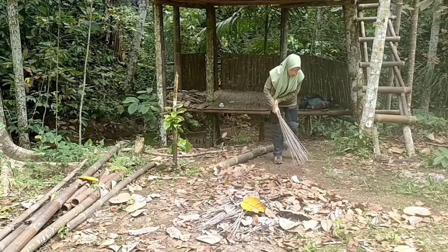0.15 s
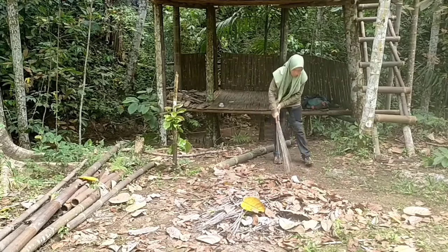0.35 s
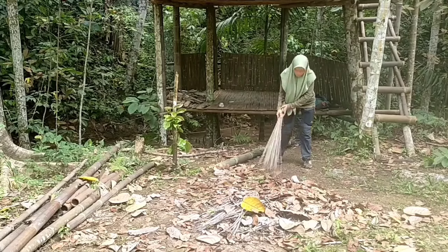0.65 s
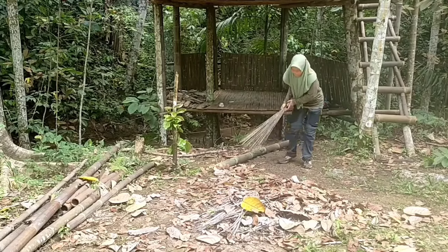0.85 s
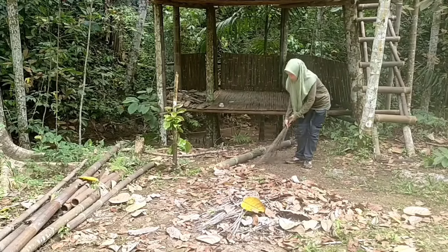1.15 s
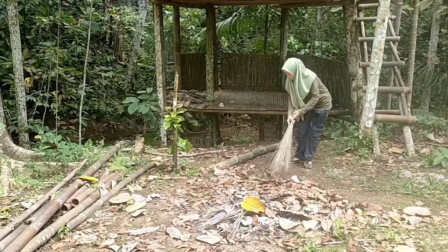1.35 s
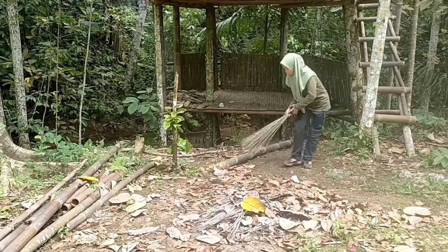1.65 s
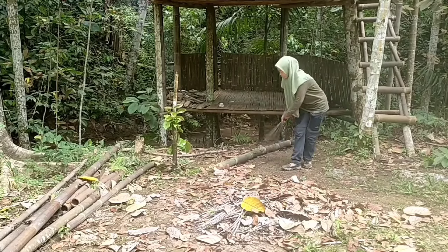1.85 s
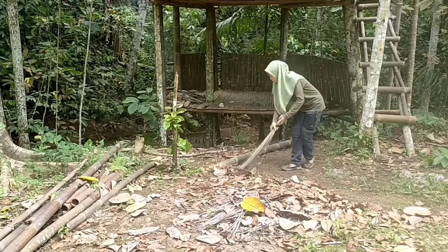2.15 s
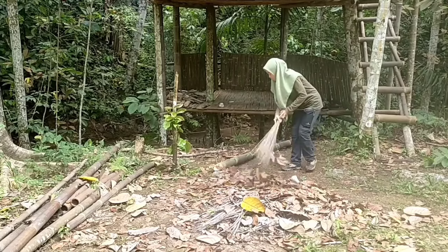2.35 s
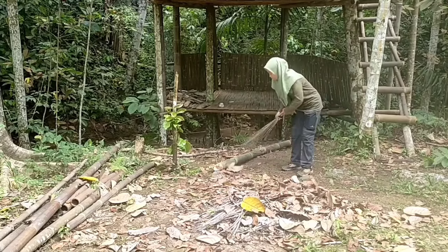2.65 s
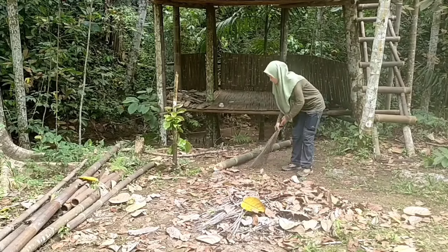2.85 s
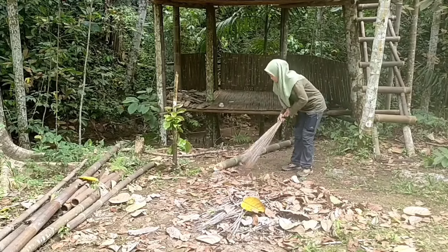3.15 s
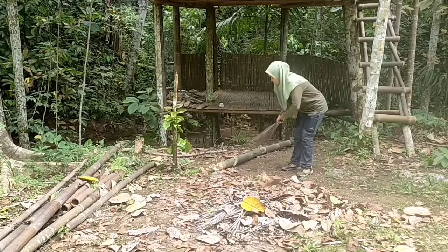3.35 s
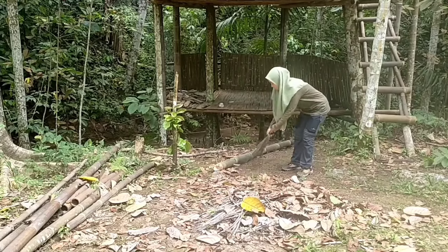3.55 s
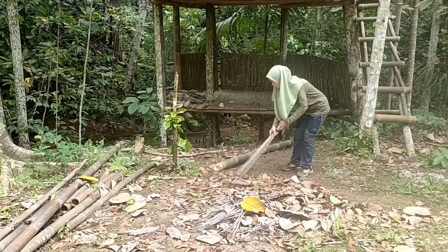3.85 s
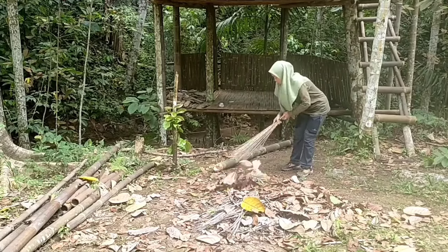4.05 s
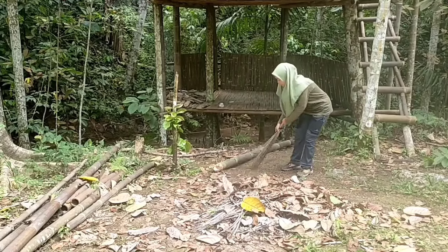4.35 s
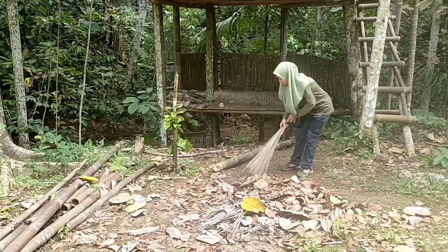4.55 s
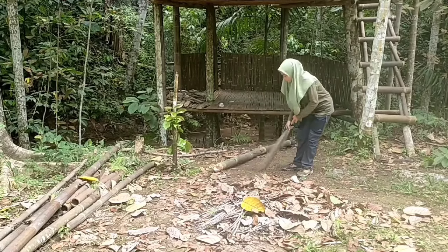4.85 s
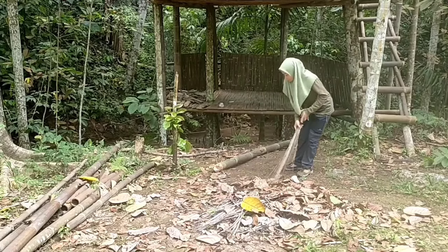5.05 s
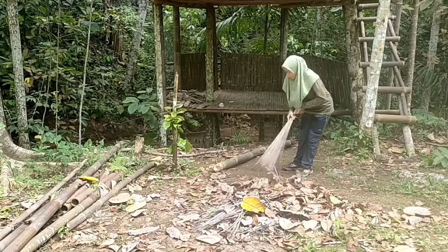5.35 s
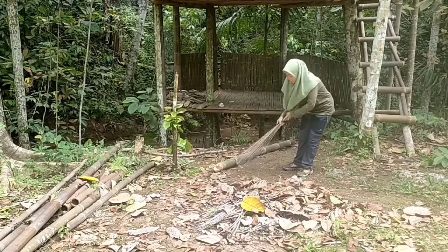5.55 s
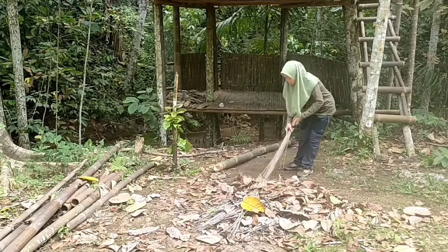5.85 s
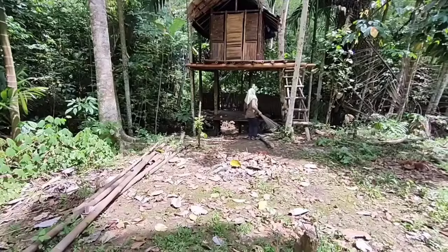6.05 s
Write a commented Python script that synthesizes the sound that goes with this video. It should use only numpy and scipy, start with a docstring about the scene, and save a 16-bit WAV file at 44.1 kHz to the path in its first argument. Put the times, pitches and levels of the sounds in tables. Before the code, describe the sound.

A stick broom sweeps dry leaves over bare dirt in steady scratchy, crackling strokes, with faint forest insects droning behind.

```python
"""Dry leaves rustle under a broom of bundled sticks, sweeping bare dirt in a clearing a few metres away.
In each stroke friction at the tips scratches the soil, then leaves buckle, crackle and are shoved onto
the heap. Twigs snap or squeak now and then, and the soil gives dull scuffs. The trees scatter back a
soft echo; behind it insects drone, foliage hisses and a faint draught rumbles."""
import sys
import numpy as np
from scipy import signal
from scipy.fft import rfft, irfft
from scipy.io import wavfile

SR = 44100
rng = np.random.default_rng(int(sys.argv[2]) if len(sys.argv) > 2 else 0)


def waveform_to_disk(signal):
    """Save audio, clipped to [-1, 1], as 16-bit WAV at the path in sys.argv[1]."""
    frames = np.transpose(np.atleast_2d(signal))
    scaled = np.clip(frames, -1, 1) * 32767
    samples = np.round(scaled).astype(np.int16)
    wavfile.write(sys.argv[1], SR, samples)


N = 273861
TIME = np.arange(N) / SR

# Broom strokes, columns as named below. Landing is the firmness of touchdown; a bite is the tips' first
# level relative to their peak; tilt brightens the leaves; first and second are the lags of two bounces.
STROKES = [(-0.17, 0.23, 0.092, 0.12, 19, -7, -37.5, -35.5, -38, 4210, 2.5, -44.5, -5, 1.13, 2.6),
           (0.493, 0.15, 0.17, 0.5, 11, -8, -41, -48, -48, 4150, 8.5, -46, -9, 1.8, 2.59),
           (1.245, 0.17, 0.14, 0.073, 1.5, -9.5, -34, -32.5, -39, 4107, -0.5, -42, -7, 1.73, 2.53),
           (2.085, 0.18, 0.13, 0.18, -4, -9, -36, -29.5, -33.5, 3730, 1.5, -41.5, -10, 1.48, 2.5),
           (2.941, 0.22, 0.15, 0.012, 8.5, -5, -38, -38, -41, 3630, 5, -45, -4, 1.25, 2.38),
           (3.65, 0.15, 0.28, 0.092, -31, -12.5, -33, -34, -36.5, 3730, -2, -41, -10, 1.15, 2.53),
           (4.51, 0.17, 0.081, 0.16, -1, -2, -38.5, -41, -41.5, 4020, 7, -46.5, -8, 1.88, 2.47),
           (5.035, 0.17, 0.11, 0.26, 2.5, 2, -41, -33.5, -37.5, 4007, -2, -46.5, -1, 1.73, 2.53),
           (5.825, 0.15, 0.097, 0.056, 7.5, -1, -40, -33, -36, 3674, 0, -44.5, -7.5, 1.6, 2.62)]
STROKE = dict(zip(("start_s", "gather_s", "push_s", "lift_s", "landing_db", "bite_db", "tips_db",
                   "leaves_db", "heap_db", "tip_hz", "tilt_db", "hiss_db", "hiss_bite_db",
                   "first_ms", "second_ms"), np.transpose(STROKES)))
# Spectra of tip scratch, tip hiss, leaves, heap and far foliage: frequency_hz, gain_db
SCRATCH_SPECTRUM = [(1000, -23.5), (2500, 1), (4200, 8.5), (6000, 3.5), (7300, 2.5), (8300, -10.5),
                    (16000, -30)]
HISS_SPECTRUM = [(3000, -36), (6200, -13), (7300, -8.5), (8300, -0.5), (10500, 3), (12200, 0), (14000, 3.5),
                 (16000, -5.5)]
RUSTLE_SPECTRUM = [(700, -18.5), (1800, -3.5), (2900, -1), (3700, 2), (4500, -1), (5400, -0.5),
                   (6400, -6.5), (7400, -4.5), (8500, -41), (16000, -20)]
HEAP_SPECTRUM = [(50, -30), (110, -19.5), (215, -0.5), (300, -13.5), (440, -1.5), (600, -7.5), (850, -4.5),
                 (1080, -2.5), (1500, -3), (2050, 2), (2800, -3), (4500, 2.5), (9000, -45.5)]
FOLIAGE_SPECTRUM = [(25, -15), (60, -2.5), (110, -5.5), (200, -1), (450, 5), (900, 6), (2000, 7.5),
                    (3500, 7.5), (5500, -7.5), (7200, -4), (8300, -18), (15000, -17)]
# Left-right likeness of near and of diffuse sound: frequency_hz, correlation
NEAR = [(60, .6), (300, .95), (700, .85), (1150, .62), (2100, .78), (3200, .5), (4400, .45), (5500, .08),
        (8000, -.1), (16000, 0)]
DIFFUSE = [(40, 0.27), (130, -0.24), (290, 0.94), (640, 0.25), (1200, -0.13), (2300, 0.15), (5000, -0.5),
           (16000, -0.29)]
# Insects in the trees: start_s, end_s, pitch_hz, width_hz, level_db
INSECTS = [(-1, 1.7, 4385, 78, -48), (-1, 7, 4255, 230, -53), (-1, 2.2, 5425, 100, -51),
           (-1, 4.6, 5440, 220, -57), (-1, 7, 6950, 450, -59.5), (1.5, 7, 3260, 200, -58)]
# Twigs and stiff leaves snapped or knocked: start_s, click_db, pitch_hz, trail_db, trail_t60_s
SNAPS = [(0.019, -23, 3120, -38, 0.034), (0.364, -33, 2380, -46.5, 0.12), (0.399, -32, 2640, -46.5, 0.099),
         (0.602, -25, 4280, -49, .03), (1.148, -54, 1260, -54, 0.078), (1.569, -17, 3930, -44, 0.043),
         (1.8, -38, 2600, -43.5, 0.065), (2.611, -23, 2770, -53, 0.037), (2.6155, -20.5, 2850, -38.5, 0.12),
         (2.857, -42, 1275, -49.5, 0.035), (4.076, -25, 2700, -42, 0.03), (4.101, -22, 3500, -37, 0.02),
         (4.29, -35, 2300, -48, 0.061), (4.319, -43, 2800, -53, 0.041), (4.772, -32, 2600, -37, 0.04),
         (4.823, -37, 2800, -45, 0.058), (5.0245, -26, 3630, -43, 0.087), (5.067, -34, 3640, -42.5, .09),
         (5.72, -45, 1150, -56, 0.06), (5.866, -29, 3160, -34, 0.064)]
# Thick clumps of leaves crushed by the broom: centre_s, half_length_s, level_db, pitch_hz
CLUMPS = [(0.09, 0.026, -33, 4460), (0.675, .025, -40.5, 2200), (1.52, .03, -42, 2000),
          (1.555, .028, -36.5, 3900), (2.272, 0.025, -27.5, 3500), (2.333, .03, -33, 2200),
          (3.113, 0.033, -37, 3600), (3.25, .04, -38.5, 3930), (3.797, .025, -35.5, 3800),
          (4.148, 0.019, -34, 2980), (4.681, .06, -37, 3930), (5.245, 0.023, -33, 3620),
          (6.014, 0.044, -38, 2100)]
# Scuffs of the broom head and of feet on soil: start_s, level_db, pitch_hz
THUDS = [(1.499, -48.5, 250), (2.335, -50, 205), (2.611, -47, 450), (3.982, -47, 217), (4.065, -42, 393),
         (4.085, -47.5, 140), (4.294, -52.5, 200), (5.863, -44, 792), (6.055, -46.5, 181)]
# Sticks slipping on a twig: centre_s, half_length_s, level_db, pitch_hz
SQUEAKS = [(3.871, 0.01, -40, 1850), (4.821, 0.014, -38.5, 2000)]


def from_db(db):
    """Amplitude grows tenfold for every 20 decibels."""
    return 10 ** (np.asarray(db) / 20)


def rms_one(x):
    """Division by the root mean square gives unit power."""
    return x / np.sqrt(np.mean(x ** 2) + 1e-20)


def at_hz(points, hz):
    """Interpolation on a logarithmic frequency axis."""
    frequency, value = np.transpose(points)
    return np.interp(np.log(hz + 1), np.log(frequency), value)


def drift(rate_hz):
    """Low-pass filtering leaves a slow random fluctuation of unit power."""
    pole = np.exp(-80 * np.pi * rate_hz / SR)  # one step per 40 samples
    slow = signal.lfilter([1], [1, -2 * pole, pole * pole], rng.standard_normal(N // 40 + 2002))[2000:]
    return np.interp(np.arange(N) / 40, np.arange(len(slow)), rms_one(slow))


def resonate(x, hz, width_hz):
    """A damped resonator passes a band about its natural frequency, with unit peak gain."""
    r = np.exp(-np.pi * width_hz / SR)
    feedback = [1, -2 * r * np.cos(2 * np.pi * hz / SR), r * r]
    return signal.lfilter(np.array([1, 0, -1]) * (1 - r * r) / 2, feedback, x + 1e-18)


def colour(pair, spectrum, likeness, size=4096):
    """Minimum-phase filters shape mid and side; their power ratio sets the left-right correlation."""
    hz = np.arange(size // 2 + 1) * SR / size
    alike = np.clip(at_hz(likeness, hz), -.98, .98)
    cepstrum = irfft(np.log(from_db(at_hz(spectrum, hz)) * np.sqrt([1 + alike, 1 - alike])))
    causal = 1 + np.sign(size // 2 - np.arange(size)) * (np.arange(size) > 0)
    response = irfft(np.exp(rfft(cepstrum * causal)))
    mid, side = signal.fftconvolve(pair, response, axes=1)[:, :N]
    return np.array([mid + side, mid - side])


def stereo(pair, spectrum, likeness):
    """Spectral shaping, normalised to unit power at the stereo centre."""
    both = colour(pair, spectrum, likeness)
    return both / np.sqrt(np.mean(both.mean(axis=0) ** 2))


def contacts(per_s, spread_db):
    """Independent tiny contacts form a Poisson train of impulses of random size."""
    sizes = from_db(spread_db * np.minimum(rng.exponential(1, N), 4.5))
    return sizes * (rng.random(N) < per_s / SR)


def friction(per_s, spread_db, grain_s, clump_db):
    """Friction noise is a sum of brief decaying bursts, one per contact, bunched in strength."""
    impacts = contacts(per_s, spread_db) ** 2 + 1e-18
    power = signal.lfilter([1], [1, -np.exp(-1 / (grain_s * SR))], impacts)
    return rms_one(np.sqrt(power) * from_db(clump_db * drift(14.4)) * rng.standard_normal((2, N)))


def scatter_paths(x, longest_s, rate_hz, share_db, count=10):
    """Multipath interference: bounces off uneven ground trail the direct sound and trade strength."""
    gains = np.array([drift(rate_hz) for _ in range(count)])
    gains = gains / np.sqrt(np.sum(gains ** 2, axis=0))
    lags = (longest_s * SR * (np.arange(count) + 1 + rng.random(count)) / count).astype(int)
    reflected = sum(gain * np.roll(x, lag, axis=1) for gain, lag in zip(gains, lags))
    return rms_one(x + from_db(share_db) * reflected)


def per_stroke(name):
    """Sample and hold: a stroke's value lasts from its landing to the next."""
    return STROKE[name][np.maximum(np.searchsorted(STROKE["start_s"], TIME) - 1, 0)]


def swell(peaks_db, touches_db, lag_s, sag_db_per_s, drop_db, settle_db_per_s):
    """Strokes add in power: each lands, gathers, sags (grows, if negative), lifts off and decays."""
    landing_s = 0.057  # the sticks spread out on the ground
    power = 0
    for (start_s, gather_s, push_s, lift_s, *_), peak_db, touch_db in zip(STROKES, peaks_db, touches_db):
        age = TIME - start_s
        lifted = np.maximum(age - gather_s - push_s, 0)
        landing = np.clip(age / landing_s, 0, 1)
        build_db = np.interp(age, [landing_s, gather_s + lag_s], [touch_db, 0])
        sag_db = sag_db_per_s * np.clip(age - gather_s, 0, push_s)
        release_db = drop_db * np.minimum(lifted / lift_s, 1) + settle_db_per_s * lifted
        power = power + (landing * from_db(peak_db + build_db - sag_db - release_db)) ** 2
    return np.sqrt(power)


def tip_scratch():
    """Sliding friction of the tips on dirt makes a dense scratch that fades through the push."""
    grains = friction(per_s=13000, spread_db=1, grain_s=0.0035, clump_db=3.5)
    grains = scatter_paths(grains, longest_s=.003, rate_hz=4.8, share_db=-3.5)
    gain = swell(STROKE["tips_db"], STROKE["bite_db"],
                 lag_s=0.001, sag_db_per_s=23.5, drop_db=6.5, settle_db_per_s=16)
    return from_db(-2.5) * gain * stereo(grains, SCRATCH_SPECTRUM, NEAR)


def tip_ring(width_hz=500):
    """The tips resonate together at a pitch set by their bend, and fall quiet as they lift."""
    grains = friction(per_s=900, spread_db=-2.5, grain_s=0.00083, clump_db=2.5)
    narrow = signal.sosfilt(signal.butter(2, width_hz / 2, fs=SR, output="sos"), grains)
    carrier = np.cos(2 * np.pi * np.cumsum(per_stroke("tip_hz")) / SR)
    gain = swell(STROKE["tips_db"], STROKE["bite_db"],
                 lag_s=-0.01, sag_db_per_s=25, drop_db=18, settle_db_per_s=70)
    return from_db(-4) * gain * stereo(narrow * carrier, [(1000, 0)], NEAR)


def tip_hiss():
    """Grazing friction at the tips radiates a crisp hiss early in the stroke."""
    grains = friction(per_s=4900, spread_db=1.5, grain_s=0.0007, clump_db=1.5)
    grains = scatter_paths(grains, longest_s=.004, rate_hz=7.9, share_db=4, count=5)
    gain = swell(STROKE["hiss_db"], STROKE["hiss_bite_db"],
                 lag_s=-0.005, sag_db_per_s=25, drop_db=6.5, settle_db_per_s=27)
    return gain * stereo(grains, HISS_SPECTRUM, NEAR)


def stick_rasp(per_s=420, catch_s=.06, width_hz=50, spread_db=4):
    """Each stick catches and drags for a moment, resonating at the pitch of its free length."""
    size = int(catch_s * SR)
    bundle = np.zeros((2, N + 2 * size))
    grip = np.hanning(size)
    for when, shortness, force, bearing in rng.random((int(per_s * N / SR), 4)):
        start = int(when * (N + size))
        chatter = resonate(rng.standard_normal(size), 1300 + 5200 * shortness, width_hz)
        chatter = from_db(spread_db * force) * rms_one(chatter * grip)
        direction = [np.cos(2 * np.pi * bearing), np.sin(2 * np.pi * bearing)]
        bundle[:, start:start + size] += np.outer(direction, chatter)
    rasp = scatter_paths(rms_one(bundle[:, size:size + N]), longest_s=.003, rate_hz=4.6, share_db=-2.5)
    gain = swell(STROKE["leaves_db"], STROKE["landing_db"] - 12.5,
                 lag_s=0.011, sag_db_per_s=10, drop_db=5, settle_db_per_s=37)
    return from_db(-1.67) * gain * stereo(rasp, RUSTLE_SPECTRUM, NEAR)


def leaf_crackle(q=9.6, sizes=20):
    """Buckling rings each leaf for a few cycles at a pitch set by its size; rubbing adds noise."""
    clicks = contacts(per_s=1400, spread_db=1.5) * rng.standard_normal((2, N))
    leaf_size = rng.integers(0, sizes, N)
    pitches_hz = np.geomspace(900, 7500, sizes)
    rings = sum(resonate(clicks * (leaf_size == k), hz, hz / q) for k, hz in enumerate(pitches_hz))
    rubbing = from_db(0.5) * friction(per_s=600, spread_db=0.5, grain_s=0.00009, clump_db=-0.5)
    rustle = scatter_paths(rms_one(rings) + rubbing, longest_s=.005, rate_hz=6.4, share_db=2)
    gain = swell(STROKE["leaves_db"], STROKE["landing_db"] - 12.5,
                 lag_s=0.0055, sag_db_per_s=-10.5, drop_db=7, settle_db_per_s=23.5)
    return from_db(-9.5) * gain * stereo(rustle, RUSTLE_SPECTRUM, NEAR)


def heap_shove():
    """Friction of the sliding heap gives a duller scrape that grows through the push."""
    grains = friction(per_s=2800, spread_db=3.5, grain_s=0.00052, clump_db=.5)
    grains = scatter_paths(grains, longest_s=.007, rate_hz=7.7, share_db=0.5)
    gain = swell(STROKE["heap_db"], STROKE["landing_db"] - 28.5,
                 lag_s=0.016, sag_db_per_s=-12.5, drop_db=9, settle_db_per_s=21)
    return gain * stereo(grains, HEAP_SPECTRUM, NEAR)


def broom(pivot_hz=3630):
    """Superposition of tips, rustle and heap; the rustle's spectrum tilts anew with each stroke."""
    tips = tip_scratch() + tip_ring() + tip_hiss()
    rustle = stick_rasp() + leaf_crackle()
    low = signal.sosfilt(signal.butter(1, pivot_hz, fs=SR, output="sos"), rustle)
    brightness = from_db(per_stroke("tilt_db"))
    return tips + low / brightness + brightness * (rustle - low) + heap_shove()


def bounces(x):
    """Comb filtering by reflections from ground and timber, whose lags change with each stroke's place."""
    out = x
    for lag_column, level_db in (("first_ms", -10), ("second_ms", -9)):
        earlier = TIME - per_stroke(lag_column) / 1000
        out = out + from_db(level_db) * np.array([np.interp(earlier, TIME, side) for side in x])
    return from_db(-.9) * out


def tree_echo(x, t60_s, wet_db, size=32768):
    """Scattering by trunks and foliage returns a dull, diffuse tail that decays exponentially."""
    age = np.arange(size) / SR
    envelope = np.exp(-np.log(1000) * age / t60_s) * (1 - np.exp(-age / 0.0094))
    tail = rng.standard_normal((2, size)) * envelope
    tail = tail / np.sqrt(np.sum(tail ** 2, axis=1, keepdims=True))
    tail = signal.sosfilt(signal.butter(2, [500, 6000], "band", fs=SR, output="sos"), tail)
    return from_db(wet_db) * signal.fftconvolve(x, tail, axes=1)[:, :N]


def foliage():
    """Many small contacts in far foliage add incoherently to a soft, shifting hiss."""
    grains = friction(per_s=2900, spread_db=1.5, grain_s=0.0018, clump_db=0.5)
    grains = scatter_paths(grains, longest_s=.005, rate_hz=6.4, share_db=1.5)
    return from_db(-49) * stereo(grains, FOLIAGE_SPECTRUM, DIFFUSE)


def noise_band(hz, width_hz, shape=(2, N)):
    """Two resonators in cascade narrow white noise to a band of unit power."""
    return rms_one(resonate(resonate(rng.standard_normal(shape), hz, width_hz), hz, width_hz))


def insects():
    """Distant insects buzz as narrow bands of noise under random amplitude modulation."""
    out = 0
    for start_s, end_s, pitch_hz, width_hz, level_db in INSECTS:
        calling = np.clip(np.minimum(TIME - start_s, end_s - TIME) / .5, 0, 1)
        out = out + noise_band(pitch_hz, width_hz) * calling * from_db(level_db + drift(35))
    return out


def breeze(gust_s=3.92, gust_width_s=0.22):
    """Unsteady airflow makes a faint pressure rumble, different at each microphone port, with one gust."""
    draught = from_db(-70.5 + 4 * drift(9.1))
    gust = from_db(-57.5) * np.exp(-((TIME - gust_s) / gust_width_s) ** 2)
    spectrum = [(10, -3), (25, 5.5), (42, -3), (70, -8.5), (200, -45), (1000, -72)]
    return (draught + gust) * stereo(rng.standard_normal((2, N)), spectrum, DIFFUSE)


def snaps():
    """An impulse sets a twig in damped vibration; a ground reflection and a little crackle follow."""
    out = np.zeros((2, N))
    for start_s, click_db, hz, trail_db, t60_s in SNAPS:
        start = int(start_s * SR)
        age = np.arange(min(N - start, SR // 4)) / SR
        click = np.sin(2 * np.pi * hz * age) * hz * age * np.exp(1 - 1.3 * hz * age)
        click = click + from_db(-9) * np.roll(click, int(rng.uniform(.001, .002) * SR))
        crackle = rms_one(resonate(rng.standard_normal((2, len(age))), hz, hz * 0.48))
        trail = from_db(trail_db) * crackle * np.exp(-np.log(1000) * age / t60_s)
        out[:, start:start + len(age)] += from_db(click_db) * click * [[1], [.4]] + trail  # mid, side
    spectrum = [(80, 2), (400, 15.5), (1500, 4.5), (4500, 0), (6500, 2), (9000, -25), (16000, -15)]
    return colour(out, spectrum, NEAR)


def clumps():
    """Crushing a clump releases a short rush of dense crackle about its own resonance."""
    crunch = friction(per_s=1700, spread_db=3.5, grain_s=0.00023, clump_db=0)
    out = 0
    for centre_s, half_s, level_db, hz in CLUMPS:
        envelope = from_db(level_db) * np.exp(-((TIME - centre_s) / half_s) ** 2)
        out = out + envelope * rms_one(resonate(crunch, hz, hz * 0.59))
    return colour(out, [(300, -3.5), (4800, -2.5), (8000, -12), (16000, -7)], NEAR)


def thuds(rise_s=0.009):
    """Friction of broom head and feet on soft soil gives short, low puffs of noise."""
    out = np.zeros(N)
    for start_s, level_db, hz in THUDS:
        rise = np.clip(TIME - start_s, 0, 1) / rise_s
        out += from_db(level_db) * rise * np.exp(1 - rise) * noise_band(hz, hz * 0.95, shape=N)
    return out


def squeaks():
    """A stick slipping along a twig excites a narrow resonance: a short, rough squeak."""
    out = 0
    for centre_s, half_s, level_db, hz in SQUEAKS:
        envelope = from_db(level_db) * np.exp(-((TIME - centre_s) / half_s) ** 2)
        out = out + envelope * noise_band(hz, width_hz=230)
    return colour(out, [(1000, -2)], NEAR)


def scene():
    """Superposition of the sweeping, its echo and the steady sounds of the forest."""
    left, right = bounces(broom() + clumps()) + snaps() + squeaks() + thuds()
    sweeping = np.array([np.roll(left, 1), right])  # arrives one sample earlier on the right
    return sweeping + tree_echo(sweeping, t60_s=0.14, wet_db=-10) + foliage() + insects() + breeze()


def record(dry):
    """The sound fades at the very end, and a steep low-pass filter limits its bandwidth."""
    fade = np.interp(TIME, [6.11, 6.16, 6.2], [1, .42, 0])
    return signal.sosfilt(signal.ellip(10, .2, 80, 15600, fs=SR, output="sos"), dry * fade)


dry = scene()
out = record(dry)
waveform_to_disk(out)
```